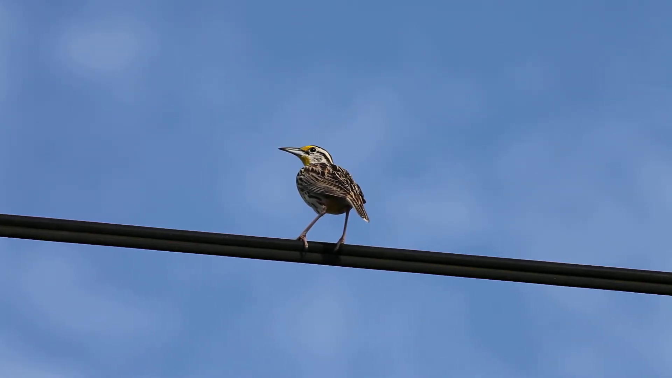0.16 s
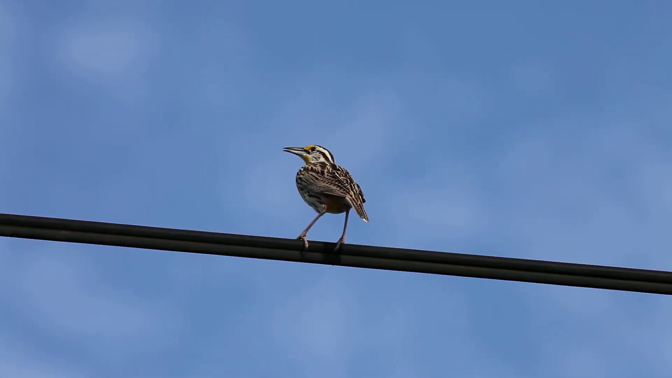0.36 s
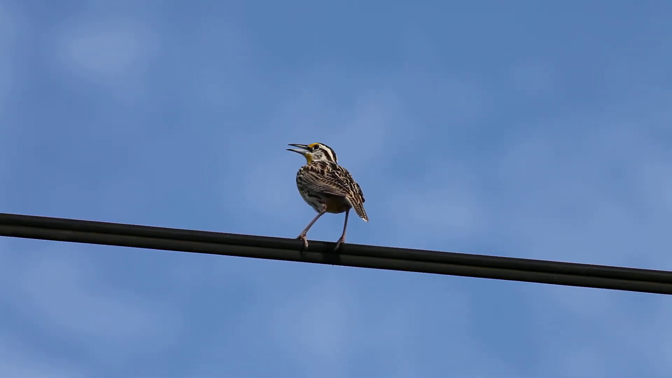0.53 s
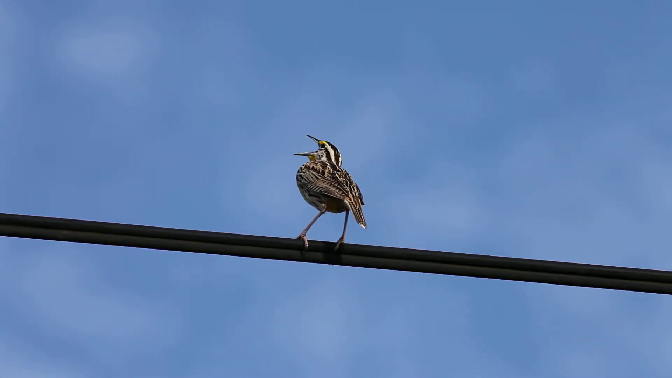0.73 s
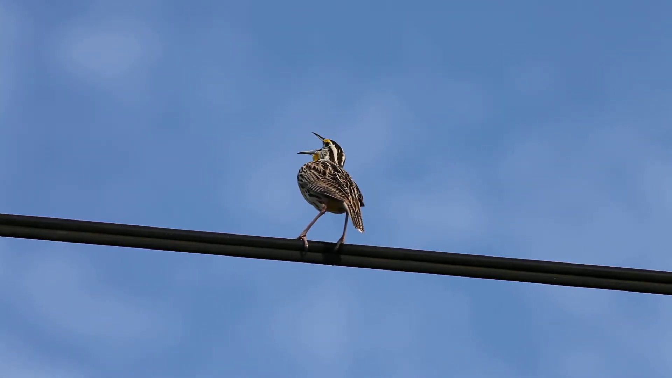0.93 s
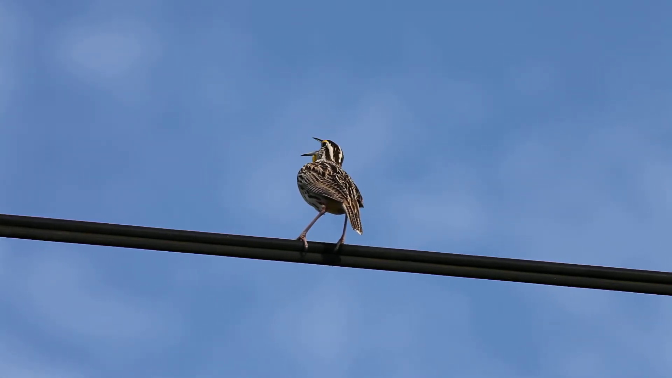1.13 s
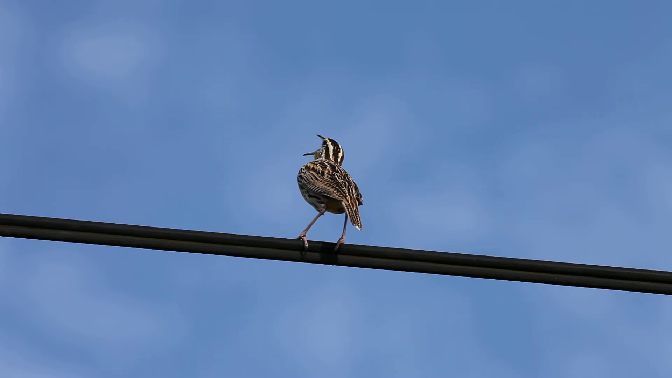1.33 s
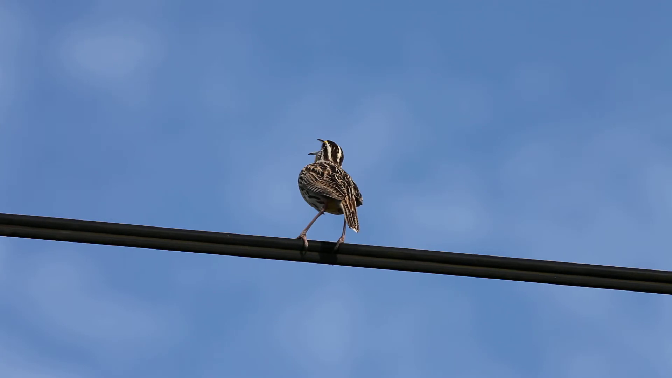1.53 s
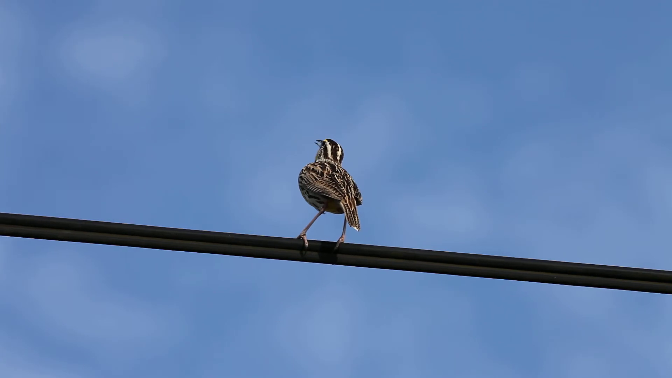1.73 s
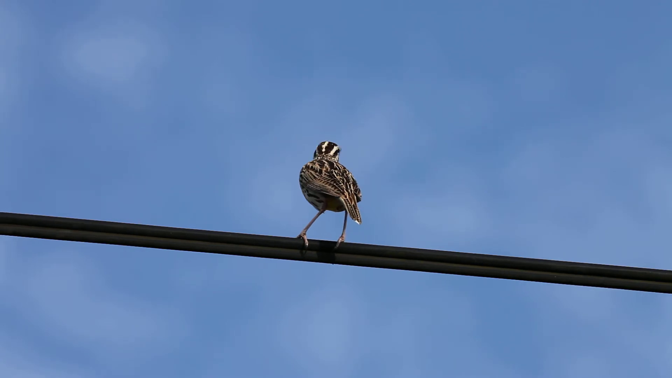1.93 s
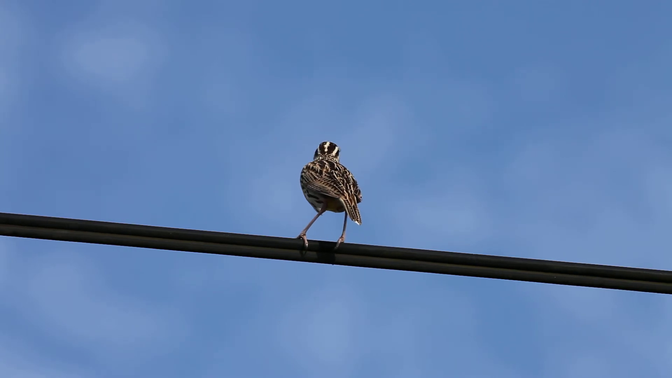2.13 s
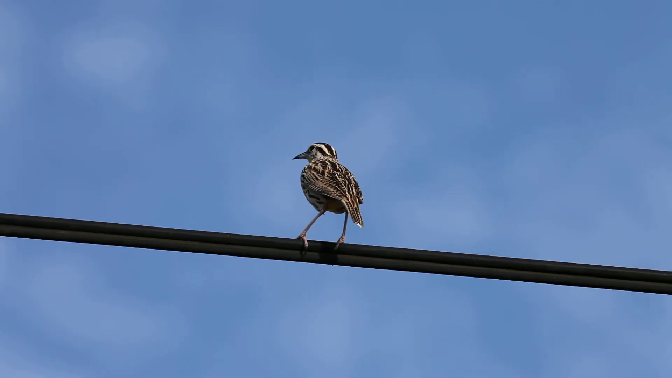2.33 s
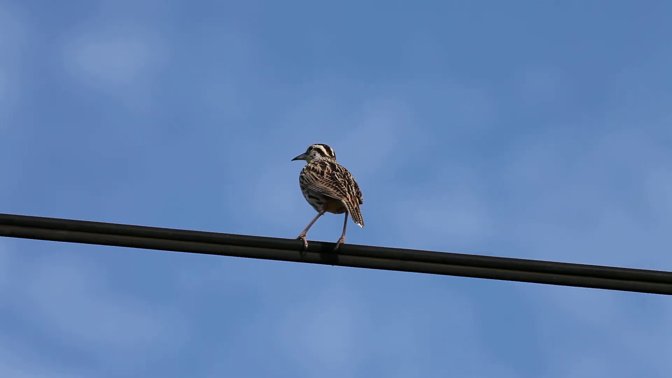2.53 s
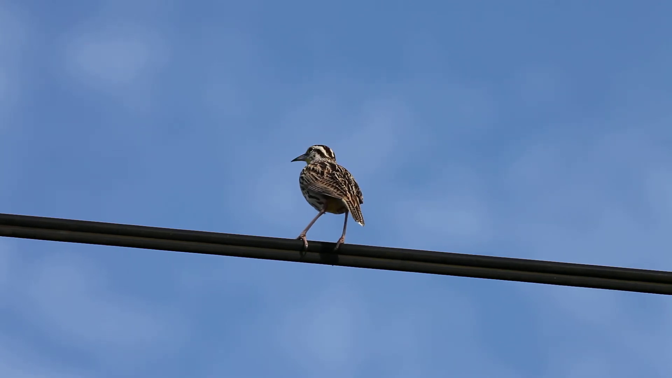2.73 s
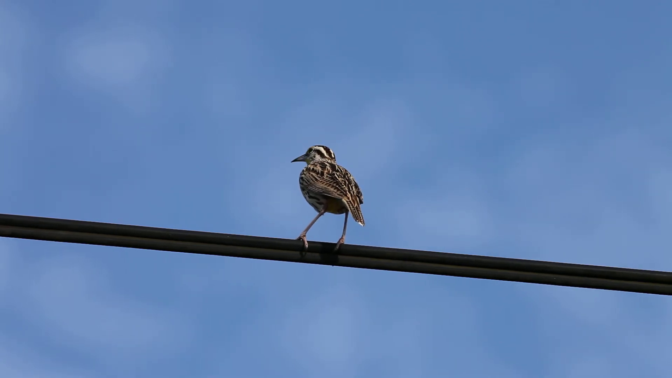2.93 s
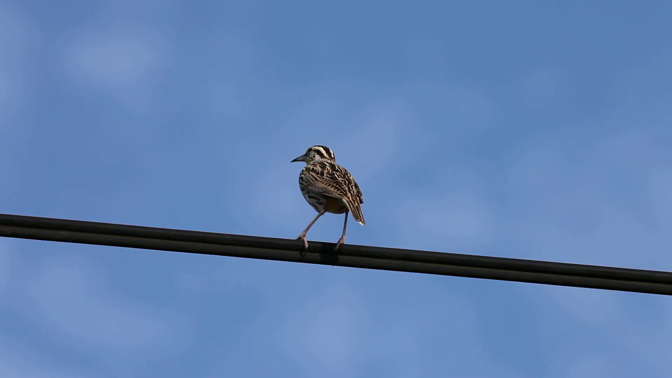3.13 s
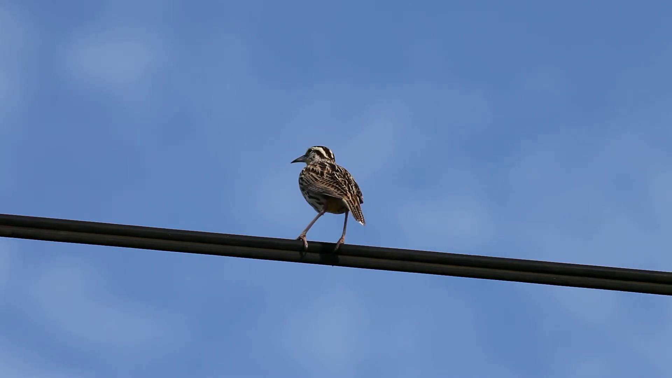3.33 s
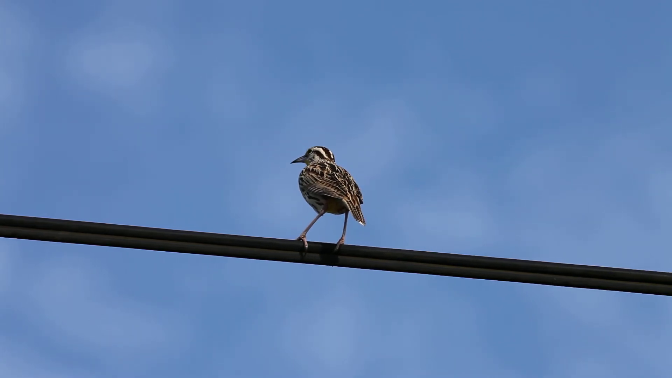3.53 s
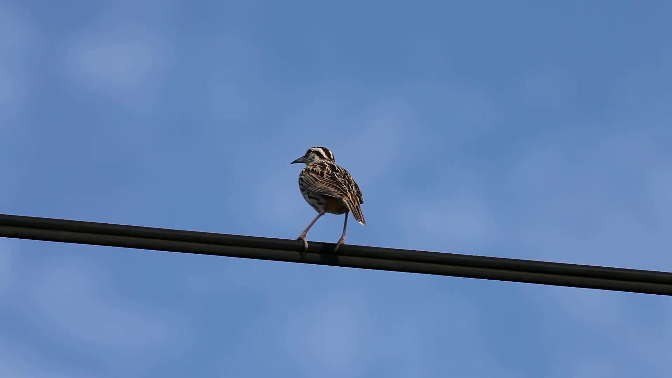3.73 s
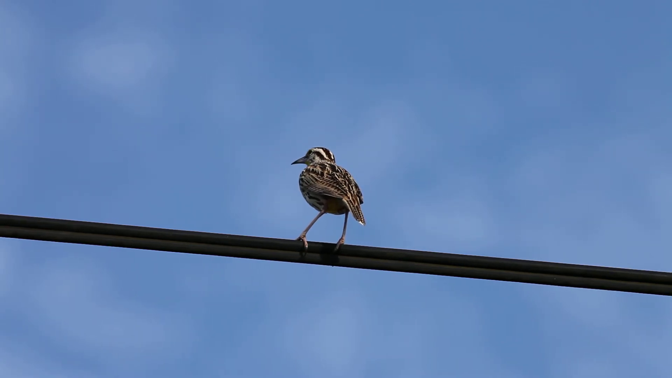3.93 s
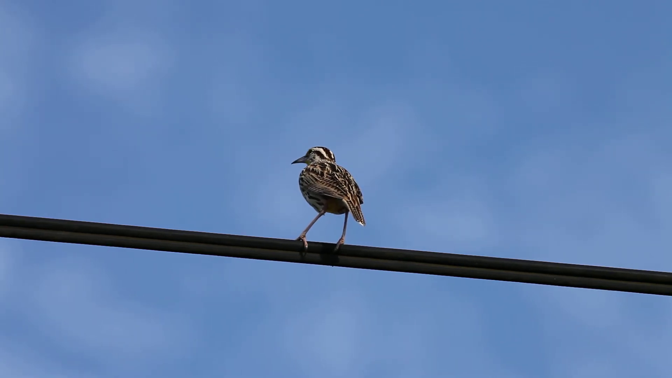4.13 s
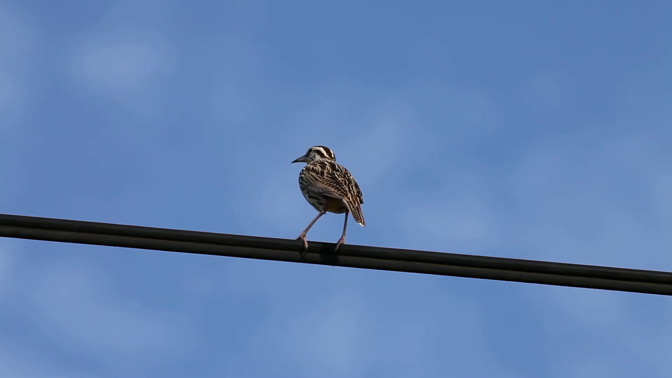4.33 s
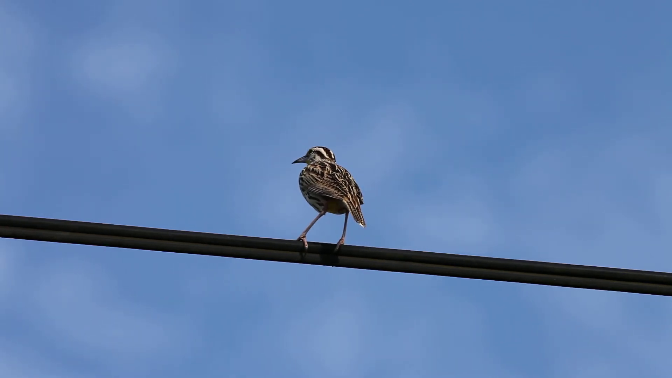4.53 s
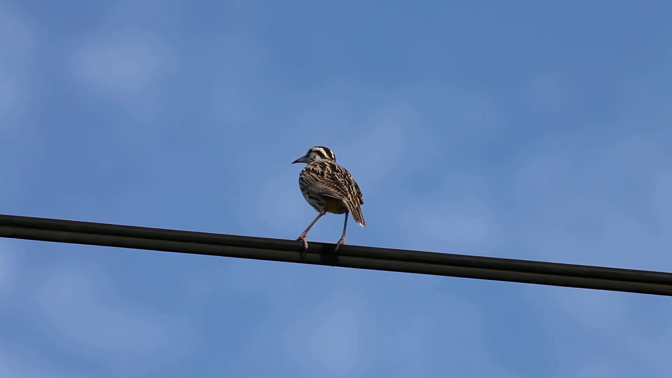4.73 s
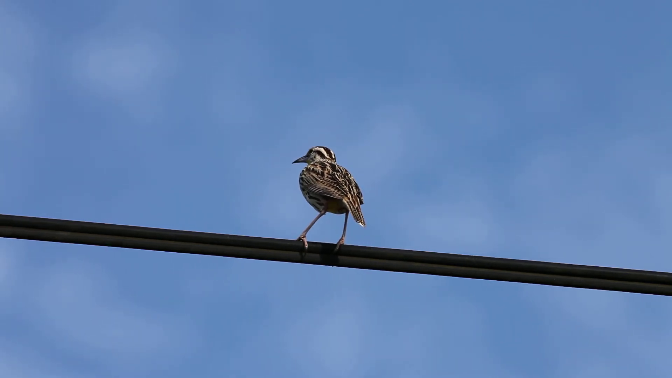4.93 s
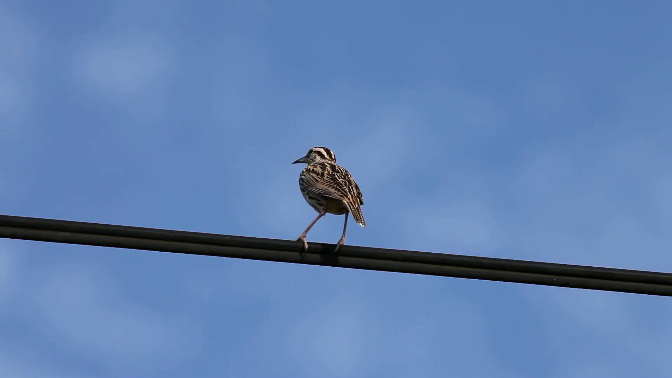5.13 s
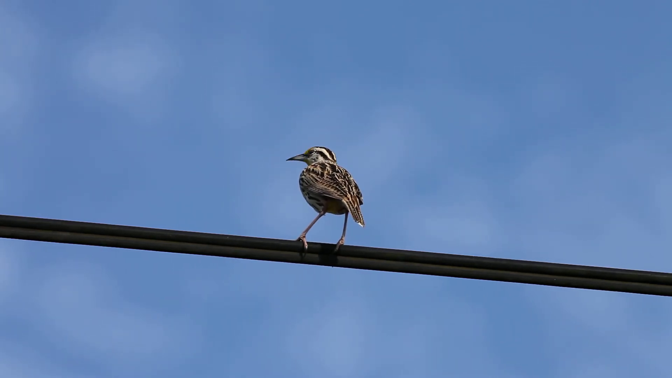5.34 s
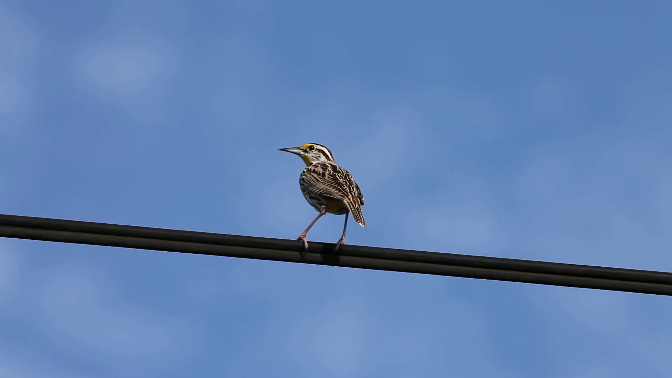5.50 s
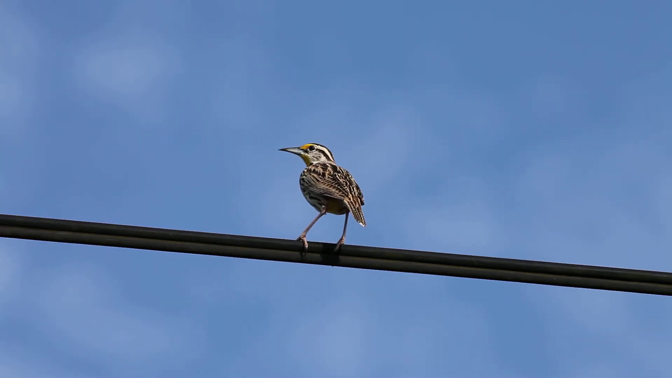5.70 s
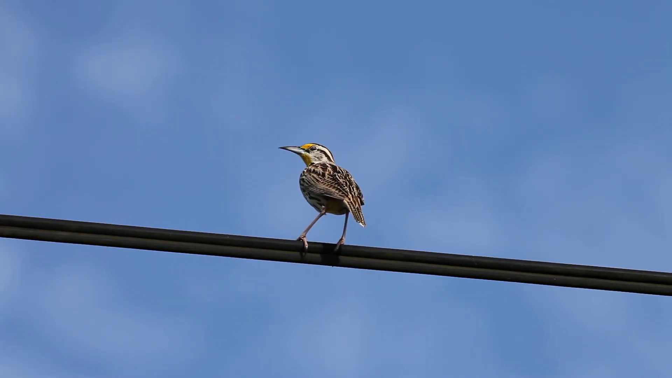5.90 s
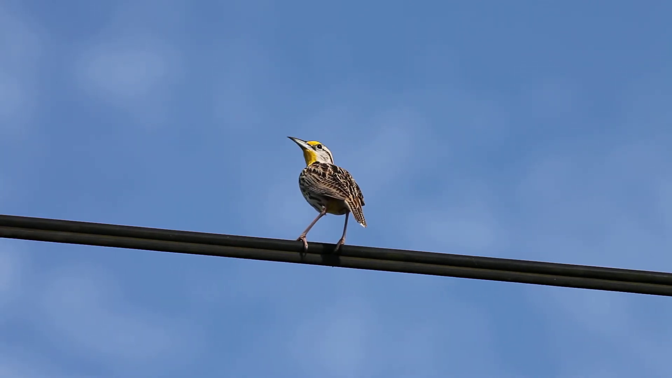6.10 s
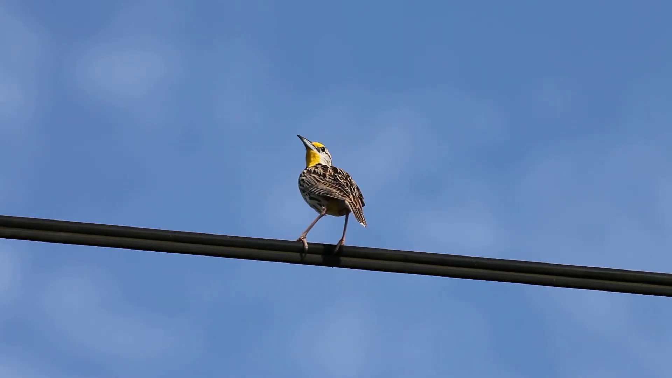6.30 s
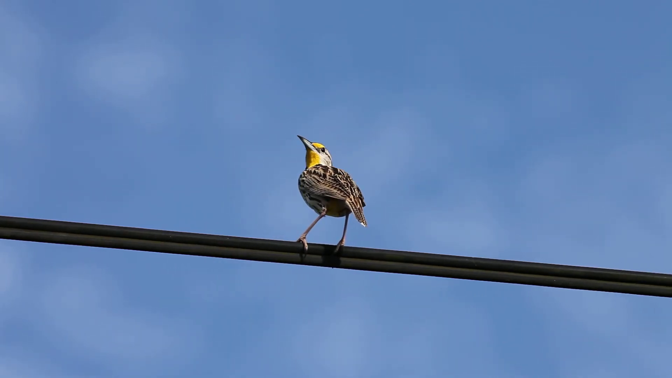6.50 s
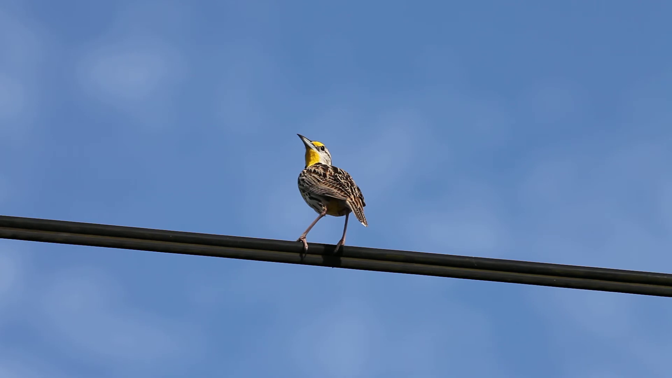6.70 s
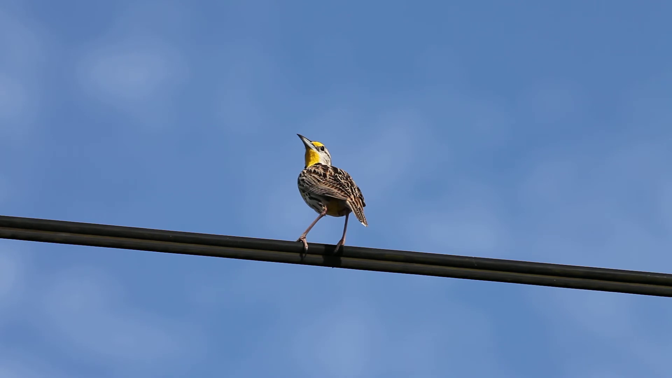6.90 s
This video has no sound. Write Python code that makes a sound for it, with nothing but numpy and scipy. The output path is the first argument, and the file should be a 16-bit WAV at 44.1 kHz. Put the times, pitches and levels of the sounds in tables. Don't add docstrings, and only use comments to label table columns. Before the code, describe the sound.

Bright slurred birdsong rings out for about a second, then faint far twittering, sharp chips and leaf ticks remain over steady low wind noise.

```python
import sys
import numpy as np
from scipy import signal
from scipy.fft import rfft, irfft, next_fast_len
from scipy.io import wavfile
from scipy.ndimage import uniform_filter1d, minimum_filter1d, map_coordinates

SR = 44100
rng = np.random.default_rng(int(sys.argv[2]) if len(sys.argv) > 2 else 0)


def to_linear_factor(level_db):
    exponent = np.asarray(level_db, float) / 20
    return 10 ** exponent


def unload_audio(sound):
    columns = np.transpose(np.atleast_2d(sound))
    steps = np.round(np.clip(columns, -1, 1) * 32767)
    wavfile.write(sys.argv[1], SR, steps.astype(np.int16))


N = 311295


def unit(x):
    return x / np.sqrt(np.mean(x ** 2) + 1e-20)


def along(points, hz):
    point_hz, value = np.transpose(points)
    return np.interp(np.log(hz + 1), np.log(point_hz + 1), value)


def wobble(rate):
    knots = rng.standard_normal(int(N * rate / SR) + 4)
    return map_coordinates(knots, [np.arange(N) * rate / SR])


def filtered(x, response):
    size = next_fast_len(N + SR // 2)
    hz = np.fft.rfftfreq(size, 1 / SR)
    return irfft(rfft(x, size) * response(hz), size)[:N]


def add(track, start_s, sound):
    part = track[max(round(start_s * SR), 0):][:len(sound)]
    part += sound[:len(part)]


def rush(spectrum, patchy_db):
    z = signal.stft(rng.standard_normal(N), nperseg=512)[2]
    patches = uniform_filter1d(rng.standard_normal(z.shape), 6, 0)
    patches = uniform_filter1d(patches, 12, 1)
    noise = signal.istft(z * to_linear_factor(patchy_db * unit(patches)), nperseg=512)[1][:N]
    return unit(filtered(noise, lambda hz: to_linear_factor(along(spectrum, hz))))


def copies(x, paths):
    def response(hz):
        return sum(to_linear_factor(db) * np.exp(-2j * np.pi * hz * ms / 1000) for ms, db in paths)
    return filtered(x, response)


def puffs(table, ms, wide):
    out = np.zeros(N)
    u = 4000 * np.arange(1500) / SR / ms
    noises = rng.standard_normal((len(table), 1500))
    for (start_s, db, hz), noise in zip(table, noises):
        limits_hz = [hz / wide, min(wide * hz, .45 * SR)]
        sos = signal.butter(2, limits_hz, "band", fs=SR, output="sos")
        band = signal.sosfilt(sos, noise)
        add(out, start_s - .001, to_linear_factor(db - 3.5) * unit(band) * u * np.exp(-u))
    return out


def far_notes(table, power, rise_hz, arch_hz):
    out = np.zeros(N)
    for start_s, length_s, middle_hz, db in table:
        u = np.linspace(-1, 1, int(length_s * SR))
        hz = middle_hz + rise_hz * u / 2 - arch_hz * u ** 2
        swell = np.abs(np.cos(np.pi * u / 2)) ** power
        add(out, start_s, to_linear_factor(db) * swell * np.sin(2 * np.pi * np.cumsum(hz) / SR))
    return out


# [pitch_hz, time_to_fade_60_db_s]
TREE_RING = [(1500, 0.42), (4000, 0.36), (10000, 0.45)]


def scattered(x, gap_s, quick):
    hz, t, z = signal.stft(rng.standard_normal(SR // 2), SR, nperseg=256)
    fade_db = -60 * quick * t / along(TREE_RING, hz)[:, None]
    tail = signal.istft(z * to_linear_factor(fade_db), SR, nperseg=256)[1]
    tail = np.pad(tail, (int(gap_s * SR), 0))
    return signal.fftconvolve(x, tail / np.linalg.norm(tail))[:N]


# [start_s, rumble_db, road_db]
AIR_LEVELS = [(0, -27.5, -43.5), (.3, -43.5, -46), (2.4, -42.5, -47), (3.7, -42, -44.5), (4.6, -44, -46.5),
              (6.5, -43, -47), (7.06, -42, -47)]
# [pitch_hz, level_db per Hz]
RUMBLE_TONE = [(12, -48), (20, -28.5), (27, -15), (42, -1.5), (65, 1.5), (90, -2.5), (105, -7.5), (140, -8),
               (180, -10.5), (330, -20.5), (430, -60), (730, -120)]
# [pitch_hz, level_db per Hz]
ROAD_TONE = [(150, -22.5), (250, 0), (281, -18), (363, 1), (400, -2.5), (429, -2.5), (473, -1), (622, 1),
             (771, -2.5), (911, 3), (1090, -7.5), (1310, -1.5), (1560, -11.5), (1770, -9), (2600, -26.5),
             (3380, -54), (5720, -120)]
# [pitch_hz, level_db per Hz]
HISS_TONE = [(1350, -24), (2300, -0.5), (2850, -1), (3320, 0.5), (4160, -2.5), (5120, -0.5), (7160, 0.5),
             (15600, -18)]
# [pitch_hz, wander_hz, level_db]
MACHINE_HUMS = [
    (58, 6, -49),
    (120, 1.5, -49),
    (155, 3, -54),
]


def air():
    start_s, *levels = np.transpose(AIR_LEVELS)
    rumble_db, road_db = [np.interp(np.arange(N) / SR, start_s, level) for level in levels]
    hums = np.zeros(N)
    for pitch_hz, wander_hz, db in MACHINE_HUMS:
        gain = to_linear_factor(db + 2.5 * wobble(4))
        hz = pitch_hz + wander_hz * wobble(8)
        hums += gain * np.sqrt(2) * np.sin(2 * np.pi * np.cumsum(hz) / SR)
    rumble = to_linear_factor(rumble_db + 1 + .7 * wobble(12)) * rush(RUMBLE_TONE, patchy_db=.8)
    road = to_linear_factor(road_db + 0.53) * rush(ROAD_TONE, patchy_db=0.98)
    hiss = to_linear_factor(-54 + 0.86 * wobble(25)) * rush(HISS_TONE, patchy_db=.7)
    return rumble + hums + road + hiss


# [start_s, peak_db, pitch_hz, cycles]
GUST_THUMPS = [(.0, -28, 112, 1.3), (0.021, -39, 69, 1.4), (.033, -16, 131, 2), (0.053, -19.5, 67, 1.9),
               (0.205, -21, 102.6, 2), (0.231, -31, 90, 1.8), (0.965, -26.5, 80.8, 1.8),
               (0.994, -24.5, 89.7, 1.6), (1.051, -21, 224, 1.7), (1.06, -19.5, 98.6, 1.8),
               (1.118, -19.5, 109, 0.98), (1.368, -24, 202, 1.4), (1.887, -26.5, 71, 0.91),
               (1.98, -28.5, 89, 1.3), (2.003, -28, 120, 1.9), (2.04, -24, 126, 1.5),
               (2.101, -30, 107, 1.4), (2.165, -34, 110, 1.3)]


def gusts():
    out = np.zeros(N)
    for start_s, db, hz, cycles in GUST_THUMPS:
        u = np.linspace(0, 1, int(cycles / hz * SR))
        swell = np.sin(np.pi * u) ** 0.57
        rocking = np.sin(2 * np.pi * cycles * u * (1.15 - 0.21 * u))
        add(out, start_s, to_linear_factor(db) * swell * rocking)
    return out


# [start_s, length_s, peak_db]
FIRST_WARBLER = [(.005, 0.039, -50), (0.047, 0.032, -45), (.126, 0.04, -51), (0.19, 0.051, -46),
                 (0.314, 0.038, -47.5), (0.374, 0.028, -51.5), (0.47, 0.034, -59), (1.957, 0.037, -50.5),
                 (2.066, 0.049, -49), (2.114, 0.038, -47.5), (2.228, 0.062, -49), (2.293, .03, -49),
                 (3.534, 0.034, -47.5), (3.592, .034, -53), (3.694, 0.056, -48.5), (3.768, 0.019, -50),
                 (4.921, 0.033, -50), (5.038, 0.048, -49.5), (5.103, 0.021, -51), (5.22, 0.039, -47.5),
                 (5.282, 0.028, -51), (6.483, 0.037, -50.5), (6.595, .038, -49), (6.76, 0.049, -45.5),
                 (6.828, 0.024, -51)]


def first_warbler():
    notes = [(start_s, length_s, 3540, db) for start_s, length_s, db in FIRST_WARBLER]
    return far_notes(notes, power=.45, rise_hz=0, arch_hz=240)


# [start_s, length_s, top_hz, peak_db]
SECOND_WARBLER = [(.088, 0.027, 3360, -49), (.245, 0.062, 3330, -51), (.492, 0.059, 3340, -58),
                  (1.995, 0.02, 3300, -48), (2.16, 0.043, 3260, -53), (2.262, 0.02, 3400, -50),
                  (2.325, .022, 3320, -49), (2.933, .028, 3060, -56), (2.963, .03, 2820, -55),
                  (3.067, 0.059, 2940, -56), (3.402, 0.045, 3416, -49), (3.415, .03, 3300, -52),
                  (3.545, 0.04, 3310, -54), (3.59, 0.037, 3300, -54), (3.935, .04, 3380, -60),
                  (4.06, .06, 3320, -62), (4.14, .05, 3300, -61), (4.484, 0.043, 3370, -50),
                  (4.61, 0.048, 3390, -49), (4.667, .036, 3270, -54), (4.77, 0.065, 3130, -61),
                  (5.629, .043, 3310, -51.5), (5.749, 0.052, 3410, -49), (5.815, 0.04, 3310, -55),
                  (5.87, 0.055, 3350, -61), (6.268, 0.058, 3130, -54), (6.33, .04, 3170, -58),
                  (6.412, 0.041, 3240, -51), (6.445, 0.034, 2900, -52), (6.465, .022, 3200, -57),
                  (6.557, 0.057, 3160, -51.5), (6.615, 0.034, 3100, -57), (6.643, 0.024, 3410, -45),
                  (6.74, 0.051, 3200, -55), (6.81, 0.037, 3300, -55), (6.946, .026, 3070, -55),
                  (6.98, 0.034, 3450, -46.5), (7.015, .022, 3400, -56), (7.043, 0.036, 3400, -50)]


def second_warbler():
    return far_notes(SECOND_WARBLER, power=.45, rise_hz=30, arch_hz=260)


# [start_s, peak_db, centre_hz]
LEAF_TICKS = [(0.1387, -34, 7200), (0.5871, -36, 6440), (2.1056, -37, 6940), (2.2212, -37, 7260),
              (2.3246, -38, 7480), (2.823, -40, 7250), (2.9507, -39, 7010), (3.1398, -40, 8620),
              (3.6526, -41, 7500), (4.6029, -42, 6350), (4.7057, -40, 7600), (4.7207, -38, 7700),
              (4.8155, -36, 6580), (5.2659, -34.5, 6160), (6.0721, -44, 6360), (6.0824, -35, 6390),
              (6.5919, -38, 8000), (6.7765, -42, 7030)]
# [start_s, length_s, start_hz, level_db]
LEAF_RUBS = [(0.604, .13, 6300, -44), (1.009, .02, 6700, -42), (2.23, .03, 8500, -52.5),
             (3.14, .025, 9200, -56), (3.517, .028, 7140, -48), (3.613, .048, 8300, -54),
             (4.87, .03, 9000, -54), (5.658, .03, 8200, -46), (5.85, 0.015, 8600, -50),
             (5.903, .02, 7300, -50), (6, .029, 8450, -47), (6.177, .025, 8600, -53),
             (6.214, 0.066, 6000, -48.5), (6.345, .023, 8500, -51), (6.892, .025, 8950, -50)]


def leaves():
    rubs = []
    for start_s, length_s, start_hz, db in LEAF_RUBS:
        progress = np.linspace(0, 1, int(length_s * 230) + 2)
        for u, a, b in zip(progress, *rng.standard_normal((2, 64))):
            tick_s = start_s + u * length_s + 0.00082 * a
            tick_hz = start_hz * 1.21 ** u * (1 + 0.064 * b)
            rubs.append((tick_s, db + 3.5 + 3 * a, tick_hz))
    return puffs(LEAF_TICKS, ms=8, wide=1.2) + puffs(rubs, ms=7, wide=1.06)


def grass(x):
    return filtered(x, lambda hz: 1 / np.sqrt(1 + (hz / 7450) ** 6))


NOTE_RISE = [(.612, 4130, -42), (.628, 4260, -32), (.655, 4600, -20), (.661, 4560, -35),
             (.668, 4830, -23.5), (.72, 5130, -15), (.75, 5333, -18), (.767, 5200, -15.5)]
NOTE_LEAD = [(0.834, 4490, -14), (.842, 4540, -35.5), (.858, 4300, -41), (.876, 4250, -36)]
NOTE_HOLD = [(.885, 4268, -22), (.897, 4270, -16), (.934, 4292, -16), (.942, 4305, -29), (.947, 4310, -13),
             (.957, 4318, -13), (.967, 4330, -16), (.986, 4347, -12), (1.0, 4385, -15)]
NOTE_TUMBLE = [(1.021, 4580, -19), (1.032, 4515, -12), (1.0355, 4180, -22), (1.0385, 4520, -27),
               (1.044, 3925, -17), (1.052, 3860, -20), (1.066, 3820, -30)]
NOTE_DROP = [(1.074, 3690, -25.5), (1.09, 3560, -14.5), (1.1, 3472, -14.5), (1.12, 3350, -10.5),
             (1.166, 3302, -12.5), (1.195, 3330, -16.5), (1.205, 3440, -20)]
NOTE_STEP_1 = [(1.214, 3936, -27), (1.229, 3910, -26), (1.237, 3770, -17.5), (1.246, 3520, -16.5)]
NOTE_STEP_2 = [(1.267, 3345, -22), (1.279, 3135, -24), (1.288, 3095, -13), (1.3, 3040, -23)]
NOTE_PIP = [(1.358, 4840, -32), (1.36, 4770, -16.5), (1.365, 4690, -12), (1.367, 4820, -22.5)]
NOTE_SLUR_1 = [(1.38, 4480, -38), (1.389, 4430, -38), (1.41, 4377, -19.5), (1.421, 4310, -18),
               (1.433, 4136, -15), (1.444, 3930, -13.5), (1.456, 3845, -15.5), (1.468, 3783, -16.5),
               (1.486, 3740, -21)]
NOTE_SLUR_2 = [(1.498, 3887, -17), (1.506, 3917, -15.5), (1.515, 3890, -31.5), (1.527, 3896, -33),
               (1.534, 3714, -18), (1.555, 3245, -17), (1.579, 3020, -23)]
NOTE_SLUR_3 = [(1.588, 2787, -21), (1.605, 2547, -26.5), (1.618, 2496, -33)]
NOTE_SLUR_4 = [(1.627, 2980, -20), (1.645, 2730, -20), (1.679, 2400, -25), (1.71, 2063, -33.5),
               (1.75, 1845, -43)]
# [second_db, third_db, fourth_db]
NOTE_OVERTONES = [(-38, -46, -70), (-35, -47, -70), (-31, -33, -70), (-27, -36, -65), (-27, -45, -52),
                  (-25, -50, -70), (-24, -55, -52), (-47, -58, -70), (-23, -40, -65.5), (-21, -48, -62),
                  (-31, -50, -60), (-34, -57, -46)]
# [late_ms, level_db]
GROUND_PATHS = [(6.39, -7), (7.6, -5.5), (7.1, -9), (6.33, -6.5), (6.325, -7), (5.4, -3), (6.32, -3),
                (6.365, -11.5), (6.365, -3), (6.33, -3.5), (5.6, -2), (6.335, -4)]
# [pitch_hz, level_db]
THROAT_TONE = [(4500, -6), (7500, 3), (10000, -10), (10700, 1), (11700, -5), (13300, 0), (14200, -12),
               (15000, -4)]


def lark():
    attack_s, release_s, edge_db = .0065, .0038, 33.5
    loud_db, overtone_lag = -15, (.6, .35, .95)
    phrase = [NOTE_RISE, NOTE_LEAD, NOTE_HOLD, NOTE_TUMBLE, NOTE_DROP, NOTE_STEP_1, NOTE_STEP_2,
              NOTE_PIP, NOTE_SLUR_1, NOTE_SLUR_2, NOTE_SLUR_3, NOTE_SLUR_4]
    out, bounced = np.zeros((2, N))
    flutter = to_linear_factor(.7 * wobble(120))
    fickle_db = [3 * wobble(55) for _ in range(3)]
    for note, path, weak in zip(phrase, GROUND_PATHS, NOTE_OVERTONES):
        s, hz, db = np.transpose(note)
        t = np.arange(s[0] - attack_s, s[-1] + release_s, 1 / SR)
        outside = np.maximum((s[0] - t) / attack_s, (t - s[-1]) / release_s)
        fade_db = -edge_db * np.maximum(outside, 0)
        pitch_hz = uniform_filter1d(np.interp(t, s, hz), size=110, mode="nearest")
        turn = 2 * np.pi * np.cumsum(pitch_hz) / SR
        curve_db = np.interp(t, s, db)
        level_db = uniform_filter1d(curve_db + fade_db, 90, mode="nearest")
        voice = np.sin(turn)
        for i, under_db in enumerate(weak):
            k = i + 2
            over_db = under_db + fickle_db[i][round(t[0] * SR):][:len(t)]
            over_db = over_db + overtone_lag[i] * (loud_db - curve_db) + along(THROAT_TONE, k * pitch_hz)
            voice = voice + to_linear_factor(over_db) * np.sin(k * turn) * (k * pitch_hz < .45 * SR)
        straight = np.zeros(N)
        add(straight, t[0], np.sqrt(2) * to_linear_factor(level_db) * voice)
        straight *= flutter
        out += straight
        bounced += copies(straight, [path])
    return out + grass(bounced)


# [late_ms, level_db]
WALL_PATHS = [
    (33, -22),
    (41, -21),
    (57, -27),
]
# [pitch_hz, level_db]
ECHO_TONE = [(1500, -6), (2500, -3), (4000, 1), (5000, -0.5), (8000, 0), (10000, -2.5), (13000, -9)]


def echoes(near):
    sway = 2.3 * wobble(45)
    moving = scattered(near * np.cos(sway), gap_s=.008, quick=1.0)
    moving = moving + scattered(near * np.sin(sway), gap_s=.008, quick=1.0)
    distant = scattered(near * np.cos(3 * sway), gap_s=.03, quick=.6)
    answer = copies(near, WALL_PATHS) + to_linear_factor(-8) * moving + to_linear_factor(-20) * distant
    return filtered(answer, lambda hz: to_linear_factor(along(ECHO_TONE, hz)))


def bowed_note():
    return far_notes([(.941, .062, 3550, -50)], power=.4, rise_hz=550, arch_hz=520)


# [start_s, length_s, middle_hz, rise_hz, peak_db]
LONG_SLIDES = [
    (.956, .024, 2600, -750, -50),
    (2.415, .065, 3710, 60, -59),
    (3.85, .37, 3290, -90, -66),
    (6.23, .04, 6150, 300, -54),
    (3.7, .14, 7450, -450, -60),
    (3.96, .33, 6200, -2750, -54.5),
    (6.09, .205, 5600, -2100, -54),
]


def slides():
    out = np.zeros(N)
    for start_s, length_s, hz, rise_hz, db in LONG_SLIDES:
        out += far_notes([(start_s, length_s, hz, db)], power=.7, rise_hz=rise_hz, arch_hz=0)
    return to_linear_factor(-2.5) * (out + scattered(out, gap_s=0, quick=2.5))


# [start_s, peak_db, centre_hz]
VOICE_BREAKS = [
    (1.033, -34, 2620),
    (1.037, -40, 8670),
    (1.103, -29, 2300),
    (1.127, -30.5, 2294),
    (1.14, -30, 2320),
    (1.371, -45.5, 6130),
    (1.49, -28, 5160),
    (1.49, -43, 8000),
    (1.582, -26, 2950),
]


def voice_breaks():
    return puffs(VOICE_BREAKS, ms=3, wide=1.2)


# [start_s, length_s, middle_hz, peak_db]
ALARM_CHIPS = [
    (2.283, 0.0079, 5180, -38),
    (2.294, 0.0061, 5350, -29.5),
    (2.461, 0.0022, 4280, -41),
    (2.464, .0041, 5300, -39),
    (2.75, 0.0042, 5220, -41),
    (5.019, 0.009, 5250, -32),
    (6.071, 0.0051, 6400, -39),
    (6.523, 0.0076, 5210, -32),
]


def chips():
    return far_notes(ALARM_CHIPS, power=1.0, rise_hz=1970, arch_hz=-80)


# [start_s, top_hz, peak_db]
TRILL_PEEPS = [
    (2.726, 4550, -55),
    (2.764, 4790, -52),
    (2.812, 4580, -57),
    (2.86, 4420, -55),
    (2.91, 4240, -56),
    (5.877, 5280, -54),
    (5.94, 5160, -53),
]


def peeps():
    notes = [(start_s, .027, hz, db) for start_s, hz, db in TRILL_PEEPS]
    return far_notes(notes, power=.7, rise_hz=0, arch_hz=330)


# [start_s, length_s, middle_hz, peak_db]
FINCH_TWEETS = [(3.25, .045, 5200, -59), (3.335, 0.028, 5400, -57), (3.405, .03, 5300, -57),
                (3.472, .04, 5250, -57), (3.545, .03, 5050, -59), (3.622, .015, 5110, -58),
                (3.688, .018, 5040, -56), (3.765, 0.014, 5050, -57), (4.94, .027, 5250, -55),
                (5.125, .035, 4970, -54), (5.186, 0.019, 4980, -52), (5.238, .038, 5300, -52),
                (5.294, 0.04, 5240, -51.5), (5.743, .036, 4670, -54)]


def tweets():
    return far_notes(FINCH_TWEETS, power=.35, rise_hz=650, arch_hz=130)


def far_birds():
    high = (slides() + peeps() + tweets()) * to_linear_factor(2.5 * wobble(350))
    songs = (first_warbler() + second_warbler()) * to_linear_factor(1.6 * wobble(250)) + high
    songs = songs * to_linear_factor(1.5 + wobble(70))
    clear = chips() + bowed_note()
    blurred = to_linear_factor(-7.5) * scattered(songs, gap_s=.002, quick=2.2)
    ringing = to_linear_factor(-13) * scattered(songs + clear, gap_s=.004, quick=1)
    return to_linear_factor(-2) * songs + blurred + clear + ringing


def scene():
    near = lark() + voice_breaks()
    return (air() + gusts() + far_birds() + leaves() + near + echoes(near))[None]


def low_pass(x):
    return signal.sosfilt(signal.butter(12, 15750, fs=SR, output="sos"), x)


def record(dry):
    power = np.abs(uniform_filter1d(dry[0] ** 2, 2500))
    level_db = 10 * np.log10(power + 1e-9)
    need_db = -1.1 * np.maximum(level_db + 11.5, 0)
    held_db = minimum_filter1d(need_db, size=7000, origin=3000)
    gain_db = uniform_filter1d(held_db, 1800)
    x = filtered(dry[0] * to_linear_factor(gain_db), lambda hz: hz < 15740)
    ceiling = .5
    limit = minimum_filter1d(np.minimum(ceiling / (np.abs(x) + 1e-9), 1), size=300)
    mix = x * uniform_filter1d(limit, size=300)
    return low_pass(mix[None])


dry = scene()
out = record(dry)
unload_audio(out)
```